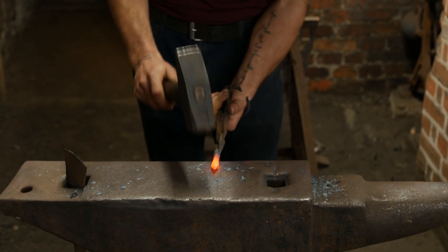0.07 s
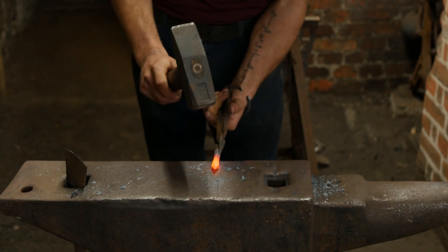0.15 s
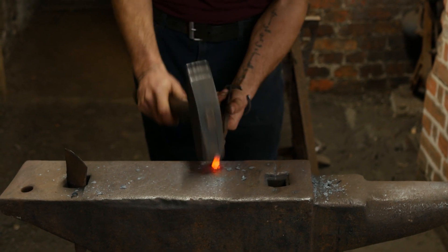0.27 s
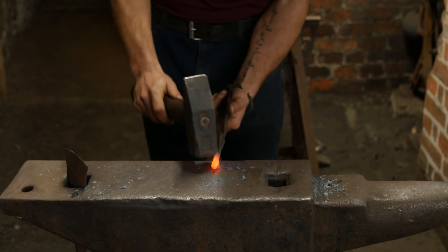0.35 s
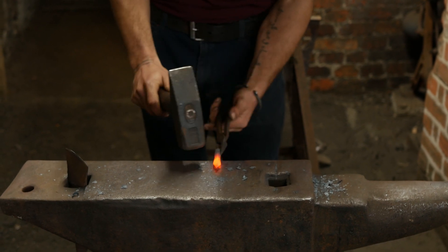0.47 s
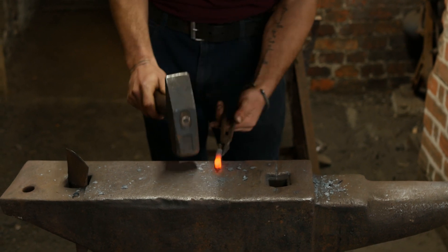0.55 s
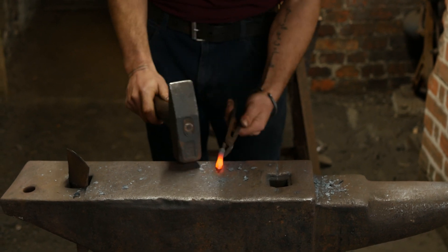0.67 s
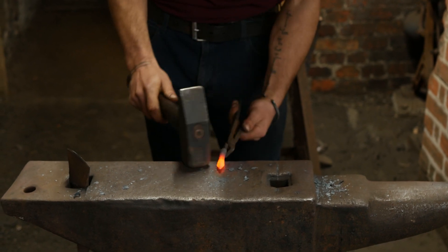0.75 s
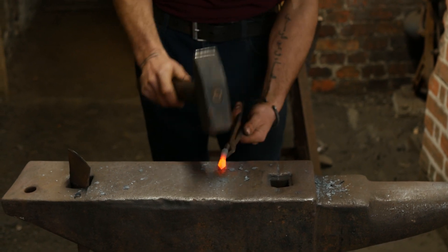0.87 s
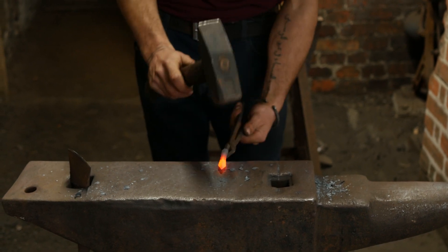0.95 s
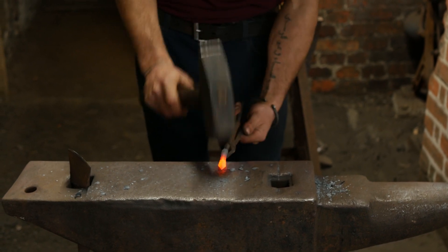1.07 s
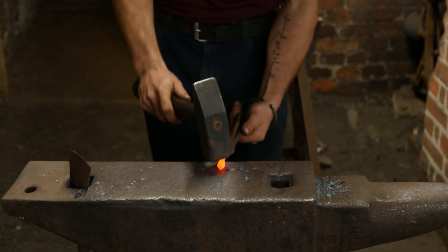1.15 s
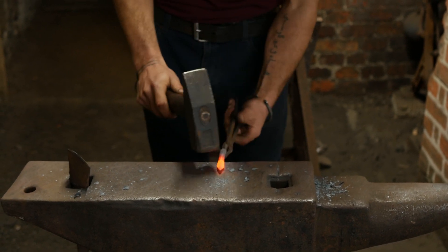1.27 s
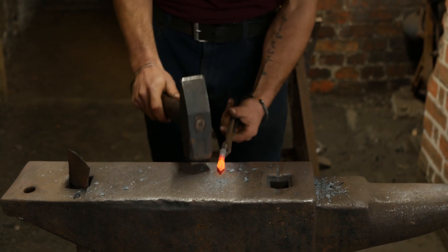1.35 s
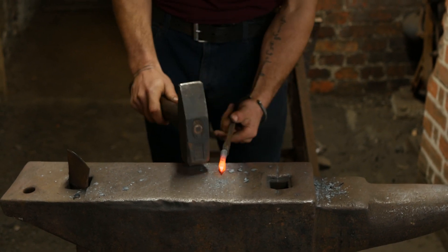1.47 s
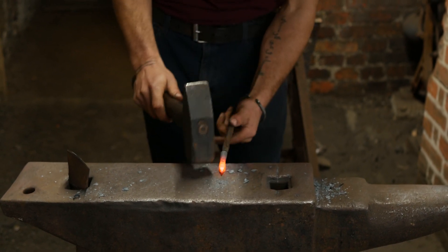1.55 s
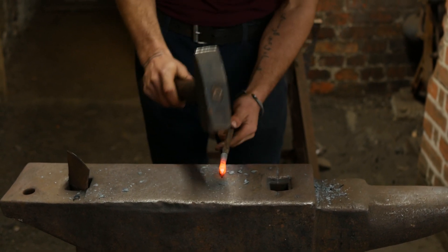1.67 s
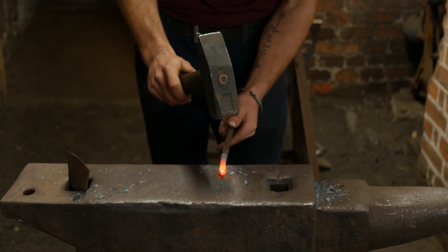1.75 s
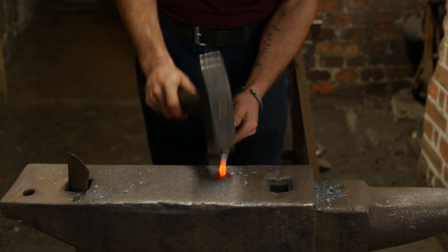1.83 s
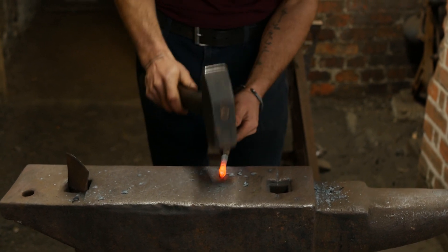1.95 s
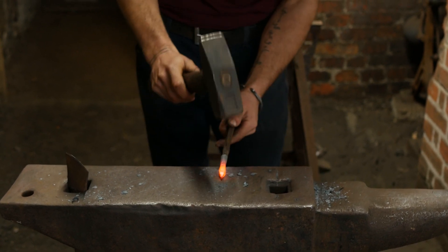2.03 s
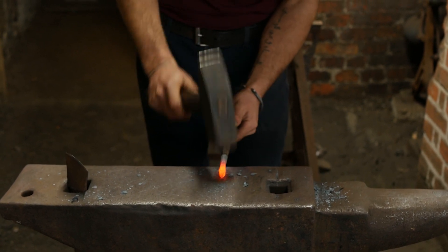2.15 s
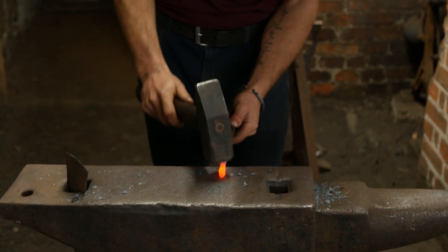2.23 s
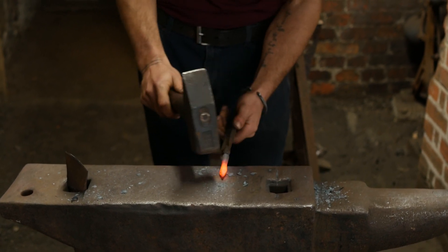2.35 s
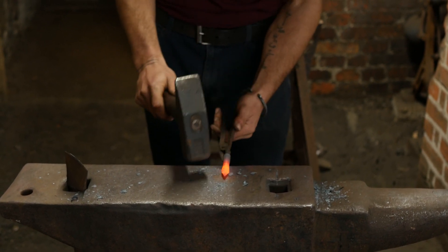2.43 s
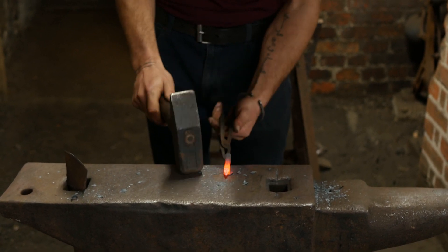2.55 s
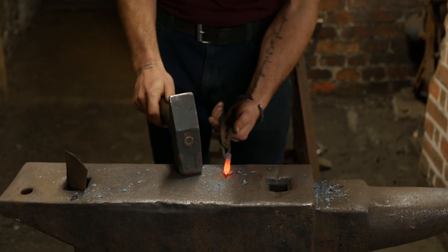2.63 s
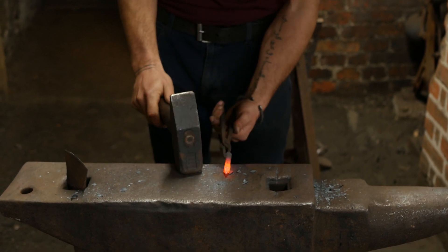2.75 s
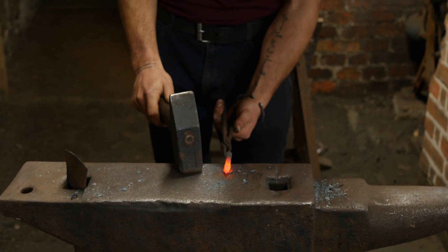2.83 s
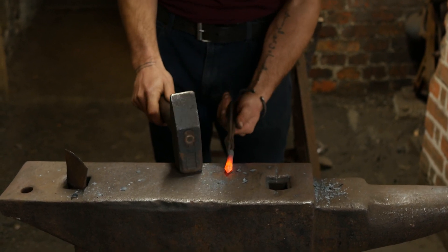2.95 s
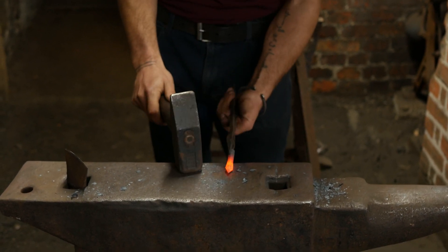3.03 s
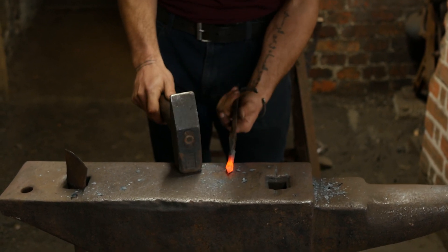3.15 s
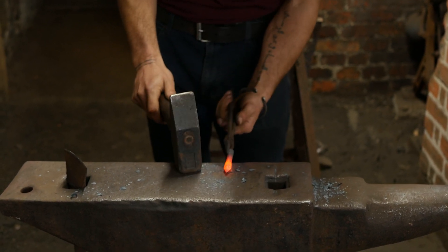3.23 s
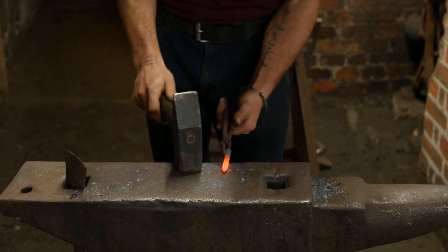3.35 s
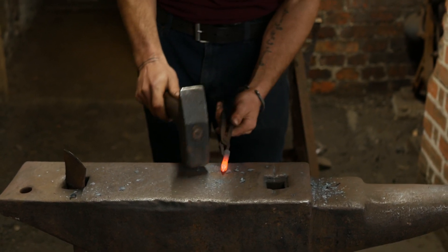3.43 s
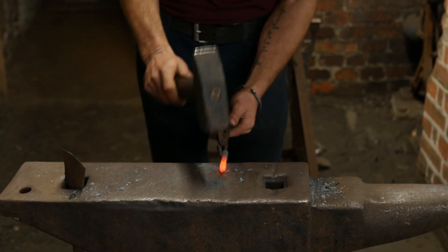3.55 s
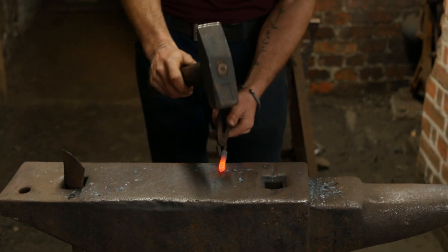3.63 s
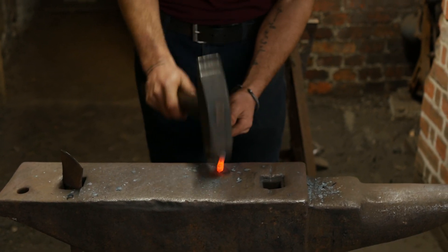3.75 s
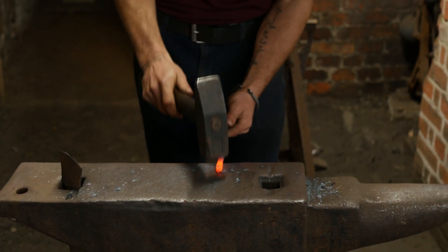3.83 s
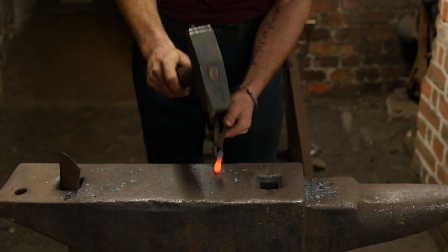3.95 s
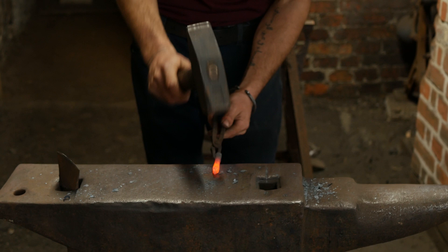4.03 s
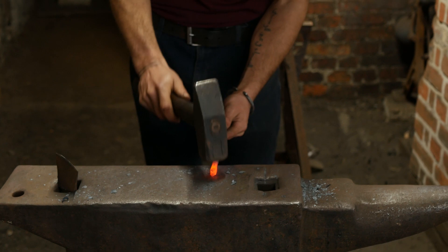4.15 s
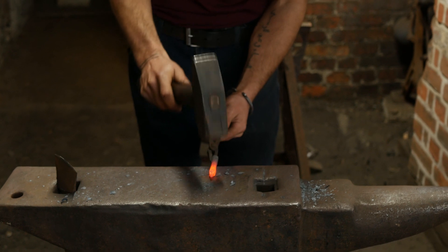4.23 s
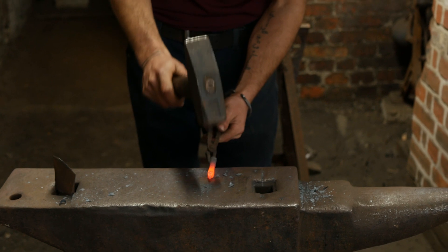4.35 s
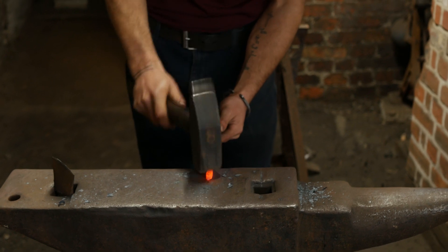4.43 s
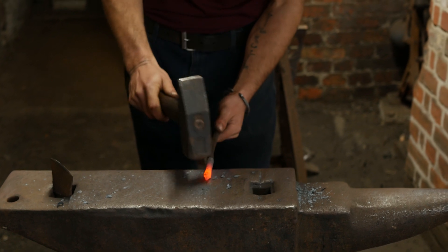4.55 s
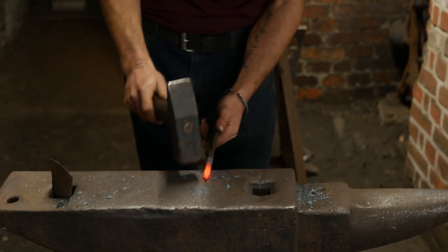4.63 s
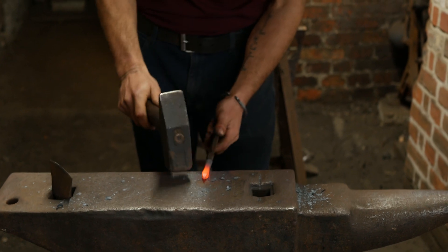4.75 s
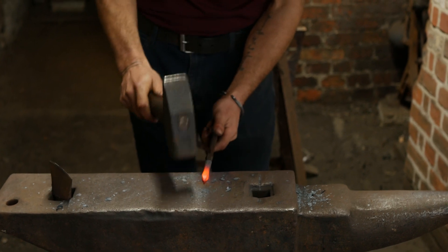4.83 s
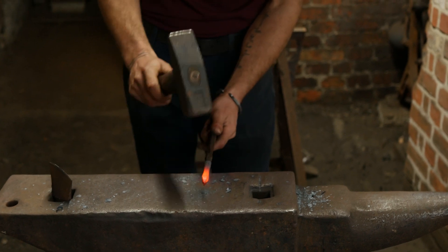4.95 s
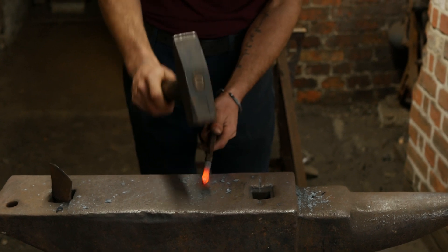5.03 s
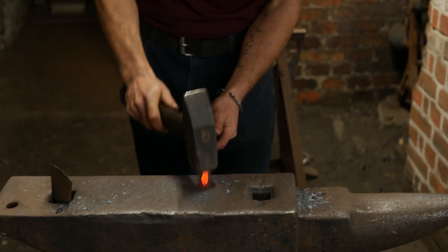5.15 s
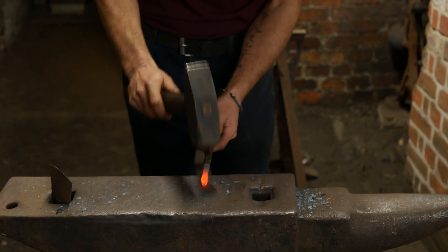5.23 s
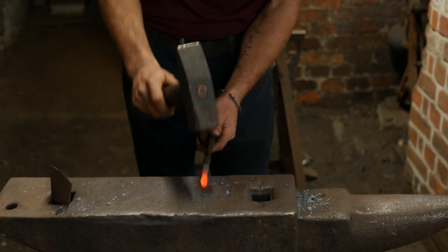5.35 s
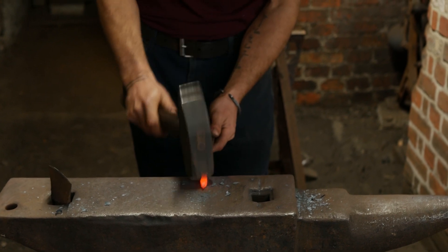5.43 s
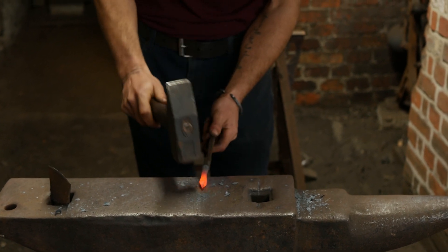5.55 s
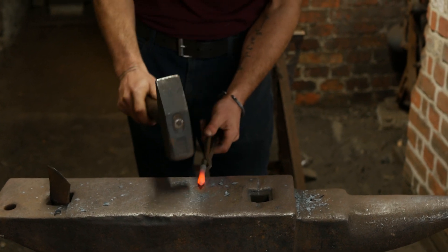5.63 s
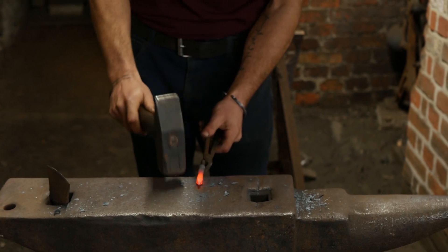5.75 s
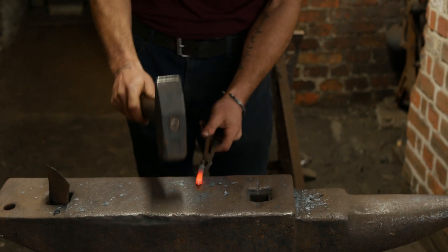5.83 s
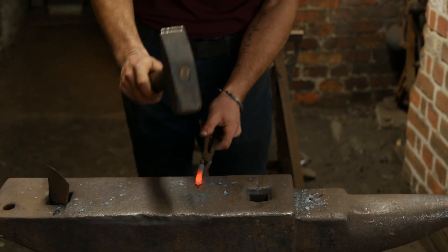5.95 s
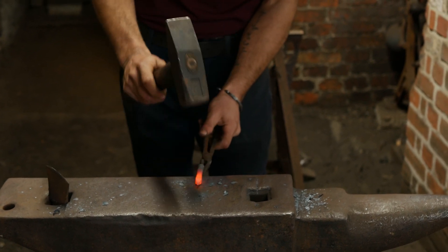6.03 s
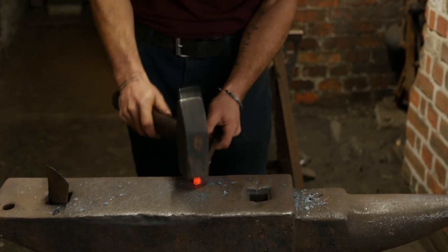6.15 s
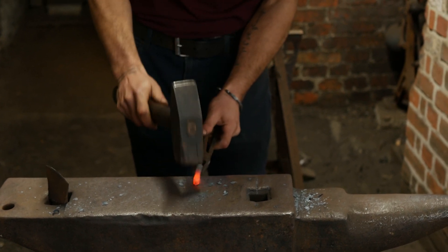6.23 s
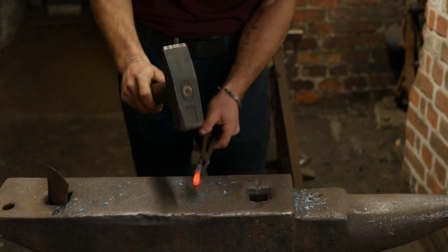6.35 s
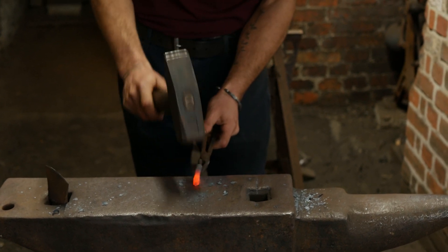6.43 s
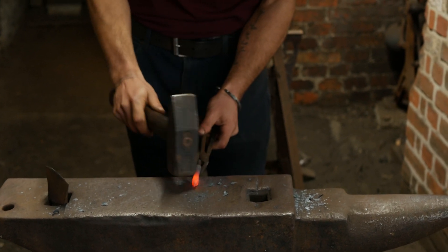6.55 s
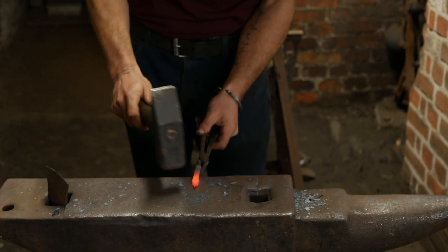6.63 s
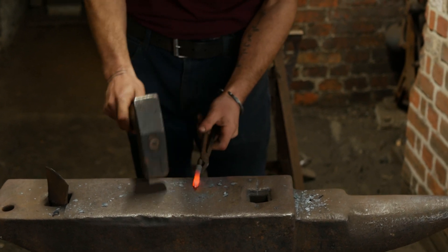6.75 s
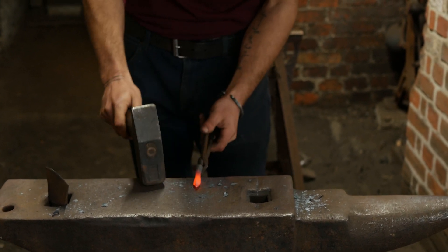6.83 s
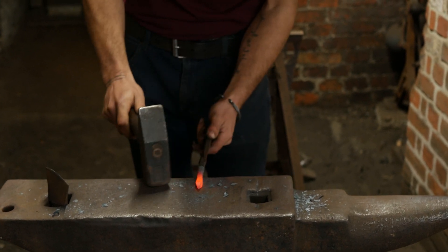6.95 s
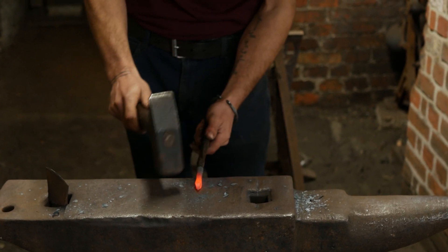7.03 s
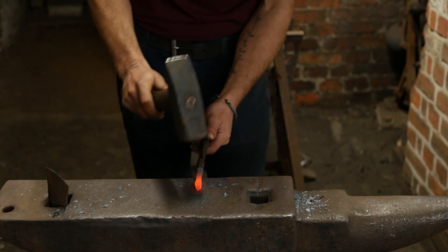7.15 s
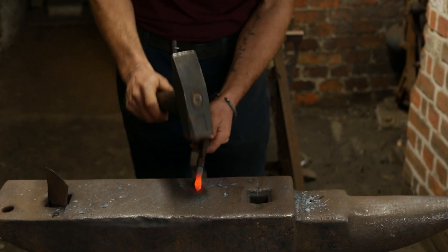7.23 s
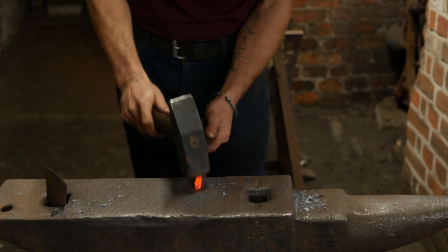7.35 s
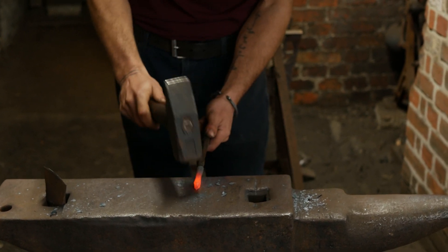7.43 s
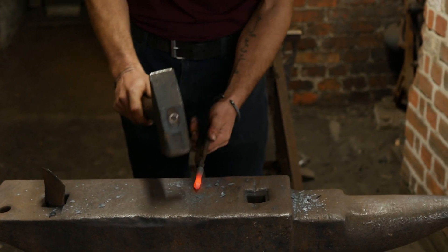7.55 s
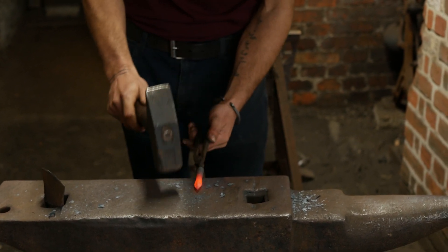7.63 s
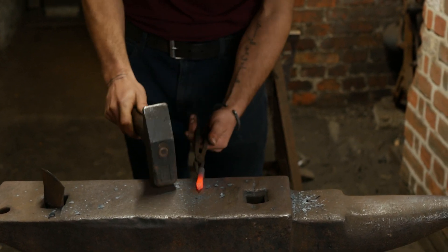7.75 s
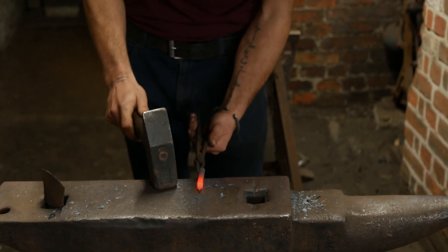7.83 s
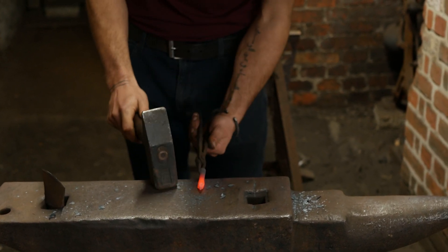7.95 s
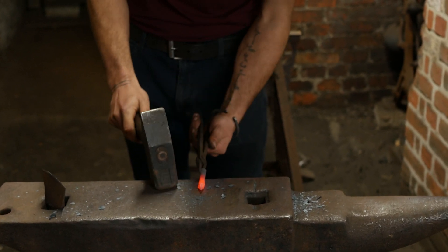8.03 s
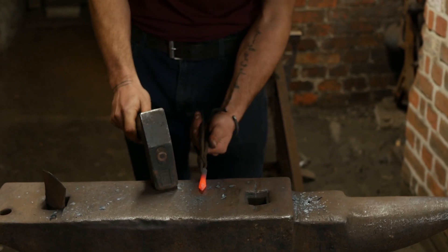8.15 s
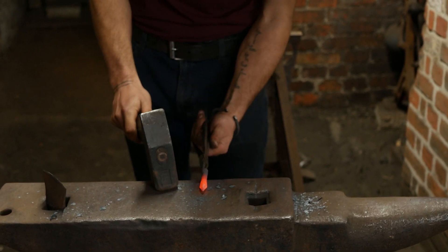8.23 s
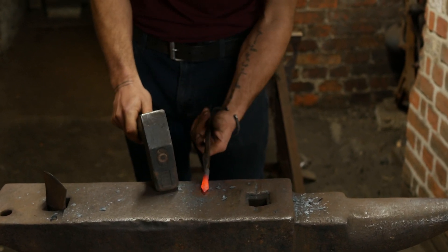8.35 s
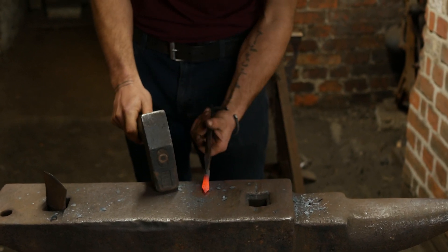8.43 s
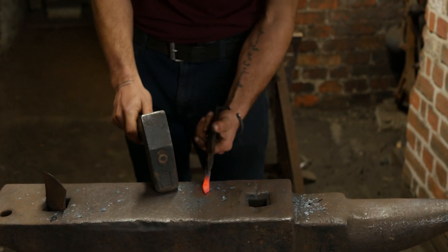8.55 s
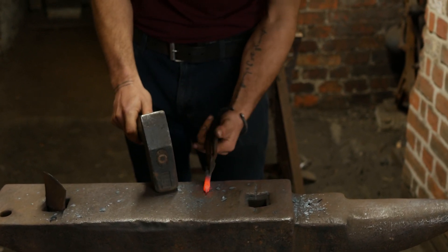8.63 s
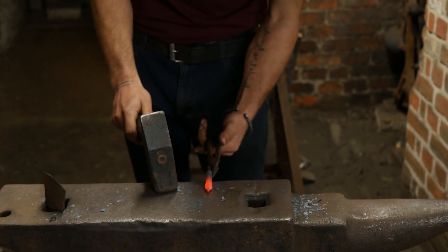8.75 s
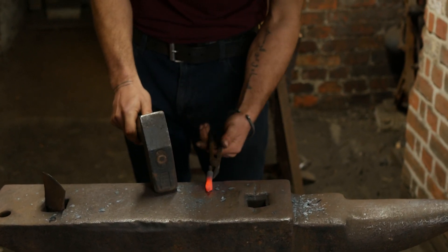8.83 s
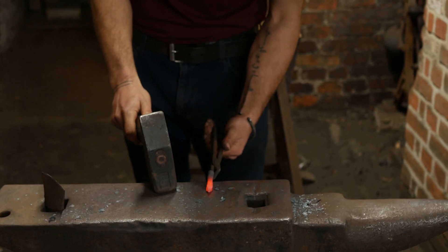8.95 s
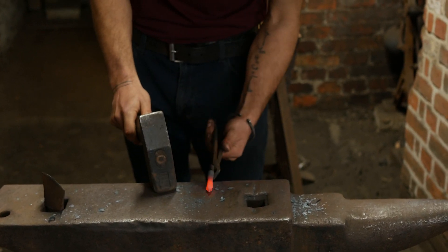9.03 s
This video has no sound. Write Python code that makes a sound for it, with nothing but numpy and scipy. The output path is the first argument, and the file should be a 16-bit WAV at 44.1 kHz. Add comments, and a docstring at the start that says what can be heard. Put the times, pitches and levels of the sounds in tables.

```python
"""A hammer blow on hot iron, right at the microphone: a smith draws out a tip in a brick workshop.
Each blow knocks, cracks off scale, rings the steel anvil and overloads the close microphone.
He taps the bare face between blows; three times the hammer lands without a rebound.
Close by, the tongs click and his feet shift. The walls echo, and farther off, outside,
a bird sings faintly over a low bed of air and hiss."""
import sys
import numpy as np
from scipy import signal
from scipy.fft import rfft, irfft, next_fast_len
from scipy.io import wavfile

SR = 44100
rng = np.random.default_rng(int(sys.argv[2]) if len(sys.argv) > 2 else 0)


def pcm_store(signal):
    """Save signal as 16-bit PCM."""
    levels = np.round(np.clip(np.atleast_2d(signal), -1, 1) * 32767)
    wavfile.write(sys.argv[1], SR, levels.astype(np.int16).T)


N = 400847
TIME = np.arange(N) / SR

# drift of the background: (time [s], relative air level [dB], relative hiss level [dB])
BACKGROUND_LEVELS = [(0, -61, -80), (2.6, -62, -76), (3.7, -59, -72.5), (4.6, -61.5, -76.5),
                     (6.5, -67, -78.5), (8.4, -62, -72), (8.8, -58.5, -65), (9.09, -57.5, -68)]
# colours of the outdoor air and the hiss: (frequency [Hz], relative density [dB])
AIR_SPECTRUM = [(25, 0.5), (60, 10), (110, -0.5), (170, -2), (230, 5.5), (400, -4.5), (700, -6.5),
                (1050, -2.5), (1600, -11), (2500, -20.5), (4500, -29), (8000, -36)]
HISS_SPECTRUM = [(3000, -5), (6000, 1.5), (8000, 2.5), (11500, 4.5), (12800, -5), (15500, -6.5)]
# the bird outside: (time [s], level at the bird [dB], wait until the slurs [s])
BIRD_SONGS = [(1.492, -64, .73), (7.677, -53.5, 0.633)]
# glides of its first hooked note and its two falling slurs: (time in the note [s], pitch [Hz])
HOOK_GLIDE = [(0, 3650), (.02, 3350), (.033, 3150), (.06, 4800)]
FIRST_SLUR_GLIDE = [(0, 4600), (.035, 3275), (.1, 2413)]
SECOND_SLUR_GLIDE = [(0, 6200), (.035, 5300), (.055, 3590), (.09, 2594), (.13, 3556), (.17, 3000),
                     (.29, 2465)]
# echo of the brick walls: (frequency [Hz], level [dB], t60 [s])
WORKSHOP_ECHO = [(60, -10, 0.71), (198, -6.5, 0.46), (410, -2.5, 0.43), (765, -19.5, 0.4),
                 (1220, -10, 0.14), (2100, -28.5, 0.31), (4300, -16, 0.2), (6860, -17, 0.3),
                 (13200, -17, 0.046)]
# the smith shifts his feet: (time [s], level [dB])
FOOTSTEPS = [(3.628, -46), (3.659, -46), (8.767, -44)]
# the tongs slip on the work between blows: (time [s], level [dB])
TONG_SLIPS = [(2.612, -56), (3.483, -49), (3.628, -48.5), (3.663, -48), (4.567, -50), (7.919, -47),
              (7.935, -52.5)]
# a short, gritty metallic bite at each hammer contact:
# (mean frequency [Hz], level when the iron is struck [dB], level when the face is struck [dB])
BITE_MODES = [(3940, -7, 6), (5820, -6, -2)]
# the hammer head's brief ping: (frequency [Hz], relative level [dB], t60 [s])
PING_MODES = [(7585, -27, .09), (9213, -24, .1), (9630, -31, .09), (10500, -21, .11), (13334, -29, .11),
              (14236, -33, .09)]
# damped resonances of hammer, anvil and stand: (frequency [Hz], width [Hz], level [dB], driving part)
BODY_MODES = [(59.6, 3.9, -2, "thud"), (70.37, 15, -6, "thud"), (99, 44, -7.5, "thud"),
              (227, 93, -13, "knock"), (358, 120, 0.5, "knock"), (434, 91, 3, "knock"),
              (512, 120, -3.5, "smack"), (665, 85, -8, "smack"), (856, 190, 1.5, "smack"),
              (1352, 1200, 12, "smack"), (2333, 520, -7.5, "smack"), (3760, 2900, -15.5, "smack"),
              (5300, 1400, -12.5, "smack")]
# steel on bare steel: (frequency [Hz], width [Hz], level [dB])
BARE_STEEL_MODES = [(1904, 200, -7.5), (2209, 280, 11.5), (3110, 160, -5), (3950, 740, -8),
                    (4600, 510, -17.5), (5830, 360, -18)]
# the workshop's low resonances (below 1 kHz) and the anvil's ringing tones, set off by each blow:
# (frequency [Hz], level [dB], t60 [s], swell [s], driving part)
RING_MODES = [(304, -37, .45, .02, "smack"), (419, -30, .5, .02, "smack"), (508, -36, .42, .02, "smack"),
              (866, -38, .38, .02, "smack"), (1252.5, 0, .31, .025, "waist"),
              (1331.8, 9, .29, .02, "waist"), (1757, -5, .27, .025, "waist"),
              (2019, -10.5, .24, .04, "clang"), (2495.6, -14.5, .32, .09, "clang"),
              (2598, 14, .33, .09, "horn"), (3000, -15, .24, .07, "clang"), (3103, -24, .2, .02, "clang"),
              (3470.8, 13.5, .41, .11, "heel"), (4322, -35, .21, .01, "clang"),
              (5144, -15, .2, .01, "horn"), (5700, -36, .2, .01, "clang"), (6941, -44, .19, .005, "smack"),
              (7267, -36, .19, .005, "clang"), (8142, -44, .18, .005, "crackle"),
              (9996, -32, .19, .005, "clang"), (11584, -29, .32, .005, "heel")]
# how a contact shares out its force:
# (part, on thin iron [dB], on thick iron [dB], on the bare face [dB], landing [dB])
FORCE_SHARES = [("thud", -34, -40.5, -51.5, -42.5), ("knock", -9.5, -10.5, -21, 0),
                ("smack", -1, .5, -6, -9.5), ("clang", -6, -38.5, -6.5, -19),
                ("waist", -21.5, -28.5, -26.5, -37.5), ("horn", -27.5, -39, -24.5, -44),
                ("heel", -32.5, -46.5, -27.5, -73)]
# the hammer lands, its weight going into the stand: (time [s], force [dB], loose scale [dB])
DEAD_LANDINGS = [(2.7509, -16.5, -45.5), (7.485, -1.5, -6.5), (7.9973, -15.5, -53)]
# taps on the bare face keep the rhythm:
# (time [s], force [dB], distance from the still point of the waist's ring [0-1], loose scale [dB])
FACE_TAPS = [(0.7855, -1.5, 0.5, -16), (1.5643, -1.5, 0.97, -10), (4.855, -1, 1, -17.5),
             (5.8902, 2, 0.68, -11), (6.9718, -0.5, .17, -16), (7.0627, -5.5, 0.54, -23)]
# blows on the hot iron: (time [s], force [dB], cushion [0 thin iron - 1 thick soft iron],
# distance from the still point of the heel's ring [0-1], loose scale [dB])
FORGING_BLOWS = [(0.0993, 0, 0.35, 0.13, -3), (0.4477, -1, 0.14, 0.08, -9), (1.2685, -1.5, 1, 0.53, 2),
                 (2.0279, -1, 0.52, 0.34, -4.5), (2.3493, -1, 0.093, .8, -0.5),
                 (3.9354, 1, 0.088, 0.88, -4.5), (4.2742, 2, .12, 1, -5), (4.601, 0, .03, 0.9, -2),
                 (5.2759, 2, 0.3, 0.3, -2.5), (5.6064, -.5, 0.033, 0.35, 0), (6.3184, 2, .2, 0.07, -6),
                 (6.6624, 1.5, 0.29, .03, -9)]


def from_db(db):
    """Decibels to gain."""
    return 10 ** (np.asarray(db) / 20)


def rms_one(x):
    """Scale to rms 1."""
    return x / np.sqrt(np.mean(x ** 2) + 1e-20)


def at_hz(points, hz, column=1):
    """Read a column of a table on a log-frequency axis."""
    points = np.array(points)
    return np.interp(np.log(hz + 1e-9), np.log(points[:, 0]), points[:, column])


def cut(x, hz, kind, order=2):
    """Butterworth filter."""
    sections = signal.butter(order, np.clip(hz, 10, .45 * SR), kind, fs=SR, output="sos")
    return signal.sosfilt(sections, x)


def add(track, s, sound):
    """Mix a sound into a track at time s."""
    start = int(round(s * SR))
    track[start:start + len(sound)] += sound[:max(N - start, 0)]


def damped(t, hz, width_hz):
    """A struck resonance of the given bandwidth; it radiates little below its own pitch."""
    return cut(np.sin(2 * np.pi * hz * t) * np.exp(-np.pi * width_hz * t), .4 * hz, "high")


def noise(spectrum):
    """Steady noise of a given colour, rms 1."""
    size = next_fast_len(N)
    colour = from_db(at_hz(spectrum, np.fft.rfftfreq(size, 1 / SR)))
    return rms_one(irfft(rfft(rng.standard_normal(size)) * colour, size)[:N])


def background():
    """The bed of the place: outdoor air and a thin hiss, slowly drifting in level."""
    s, air_db, hiss_db = np.transpose(BACKGROUND_LEVELS)
    air = from_db(np.interp(TIME, s, air_db) + 3) * noise(AIR_SPECTRUM)
    hiss = from_db(np.interp(TIME, s, hiss_db) + 1) * noise(HISS_SPECTRUM)
    return air + hiss


def whistle(glide, rasp, transpose=1):
    """One gliding note that swells and fades; a fast flutter in pitch makes it raspy."""
    s, hz = np.transpose(glide)
    t = TIME[:int(s[-1] * SR)]
    progress = t / s[-1]
    flutter = rms_one(cut(rng.standard_normal(SR // 2), 350, "low"))[:len(t)]
    pitch = transpose * np.interp(t, s, hz) * (1 + rasp * flutter)
    return 2 * np.sqrt(progress * (1 - progress)) * np.sin(2 * np.pi * np.cumsum(pitch) / SR)


def bird(hook_every_s=.124, hook_sag=.017, hook_rasp=.02, slur_rasp=.055, yard_t60_s=.38):
    """Far off the microphone: five hooked notes, then two slurs, smeared by the echoes of the yard."""
    song = np.zeros(N)
    for s, db, wait_s in BIRD_SONGS:
        for k in range(5):   # each hook is a little lower and louder than the last
            hook = whistle(HOOK_GLIDE, hook_rasp, transpose=1 - k * hook_sag)
            add(song, s + k * hook_every_s, from_db(db - 5 + 1.5 * k) * hook)
        add(song, s + wait_s, from_db(db) * whistle(FIRST_SLUR_GLIDE, slur_rasp))
        add(song, s + wait_s + .195, from_db(db + 1) * whistle(SECOND_SLUR_GLIDE, slur_rasp))
    distant = cut(song, 4200, "low")   # distance dulls the song
    yard = rng.standard_normal(SR // 2) * from_db(-60 * TIME[:SR // 2] / yard_t60_s)
    return .5 * distant + signal.fftconvolve(distant, yard / np.linalg.norm(yard))[:N]


def workshop(x, first_wall_s=.0013, build_s=.002):
    """Dense reflections from the brick around the microphone; each band dies at its own rate."""
    t, echo = TIME[:SR], np.zeros(SR)
    edges = np.geomspace(40, 18000, 19)
    onset = 1 - np.exp(-np.maximum(t - first_wall_s, 0) / build_s)
    for low, high in zip(edges, edges[1:]):
        hz = np.sqrt(low * high)
        decay = from_db(-60 * t / at_hz(WORKSHOP_ECHO, hz, column=2))
        band = cut(rng.standard_normal(SR), [low, high], "band", order=3) * onset * decay
        gain = np.sqrt(2 * (high - low) / SR) * from_db(at_hz(WORKSHOP_ECHO, hz))
        echo += gain * band / np.linalg.norm(band)
    return signal.fftconvolve(x, echo)[:N]


def floor_bounce(x, delay_s=.0038, bounce_db=-11, dull_hz=1500):
    """A dull reflection from below the anvil reaches the microphone just behind the direct sound."""
    delayed = np.interp(TIME - delay_s, TIME, x)
    return from_db(bounce_db) * cut(delayed, dull_hz, "low", order=1)


def steps(floor_hz=55, width_hz=9):
    """Feet bump softly on the floor beside the anvil."""
    out = np.zeros(N)
    for s, db in FOOTSTEPS:
        add(out, s, from_db(db) * damped(TIME[:SR // 2], floor_hz, width_hz))
    return out


def gritty_click(hz, grit_top_ratio, grit_db, grit_s, width_hz=450):
    """A short metallic ping with a gritty edge."""
    t = TIME[:SR // 10]
    grit = cut(rng.standard_normal(len(t)), [hz * .85, hz * grit_top_ratio], "band", order=3)
    return damped(t, hz, width_hz) + from_db(grit_db) * grit * np.exp(-t / grit_s)


def tongs(slip_hz=6400):
    """Close by, the jaws click as they slip on the work."""
    out = np.zeros(N)
    for s, db in TONG_SLIPS:
        add(out, s, from_db(db) * gritty_click(slip_hz, grit_top_ratio=2.2, grit_db=-3, grit_s=.011))
    return out


def contacts(sink_loss=.57, landing_steepness=1.69):
    """Every touch of the hammer as (time [s], gain of each part it sets sounding, whether on the iron)."""
    out = []
    for s, force_db, cushion, distance, scale_db in FORGING_BLOWS:
        drive = {part: from_db(force_db + np.interp(cushion, [0, 1], [thin, thick]))
                 for part, thin, thick, _, _ in FORCE_SHARES}
        drive["heel"] *= distance
        for part in ("horn", "waist"):   # a harder blow sinks in deeper and lasts longer, losing ring
            drive[part] *= from_db(-sink_loss * force_db)
        out.append((s, dict(drive, crackle=from_db(scale_db)), True))
    for s, force_db, distance, scale_db in FACE_TAPS:
        drive = {part: from_db(force_db + bare) for part, _, _, bare, _ in FORCE_SHARES}
        drive["waist"] *= distance
        out.append((s, dict(drive, crackle=from_db(scale_db)), False))
    for s, force_db, scale_db in DEAD_LANDINGS:
        steel_db = force_db * landing_steepness   # a gentle landing is also a softer one
        drive = {part: from_db(landing + (force_db if part in ("thud", "knock") else steel_db))
                 for part, _, _, _, landing in FORCE_SHARES}
        out.append((s, dict(drive, crackle=from_db(scale_db)), False))
    return out


def contact_bite(pitch_spread=.084):
    """A short, gritty metallic bite at each hammer contact, its pitch varying from blow to blow."""
    out = np.zeros(N)
    for s, drive, on_iron in contacts():
        for mode_hz, iron_db, face_db in BITE_MODES:
            hz = mode_hz * (1 + pitch_spread * rng.standard_normal())
            gain = drive["crackle"] * from_db(iron_db if on_iron else face_db)
            add(out, s, gain * gritty_click(hz, grit_top_ratio=1.6, grit_db=-13, grit_s=.01))
    return out


def scale_crackle(t, burst_s=.00055, crumble_s=.0029, crumble_db=-11, grain_db=4):
    """Scale cracks at the contact and crumbles for a few milliseconds."""
    grains = rms_one(rng.standard_normal(len(t)) * from_db(grain_db * rng.standard_normal(len(t))))
    envelope = np.exp(-t / burst_s) + from_db(crumble_db) * np.exp(-t / crumble_s)
    return cut(cut(grains * envelope, 3300, "high"), 12000, "low")


def head_ping(t, scatter_db=3, detune=.0023):
    """The head rings a little differently with every angle of contact; each mode is a close pair."""
    out = 0
    for hz, db, t60 in PING_MODES * 2:
        strength, shift = rng.standard_normal(2)
        envelope = from_db(db + scatter_db * strength - 60 * t / t60)
        out = out + envelope * np.sin(2 * np.pi * hz * (1 + detune * shift) * t)
    return out


def anvil_and_room_ring(t, drive, scatter_db=2.5, room_share=.85):
    """The anvil's tones and the workshop's low resonances build up between the walls, then die away."""
    out = 0
    for hz, db, t60, swell_s, part in RING_MODES:
        # high modes have close nodes, so their strength changes most from spot to spot
        spot_db = scatter_db * np.sqrt(hz / 2500) * rng.standard_normal()
        decay = from_db(db + spot_db - 60 * t / t60)
        swell = 1 - room_share * np.exp(-t / swell_s)
        out = out + drive[part] * decay * swell * np.sin(2 * np.pi * hz * t)
    return out


def steel_clang(t, contact_hz=5600):
    """Steel meets bare steel; the contact lasts too long to excite the top octave."""
    modes = sum(from_db(db) * damped(t, hz, width) for hz, width, db in BARE_STEEL_MODES)
    return cut(modes, contact_hz, "low", order=4)


def body_knock(t, drive, stand_s=.0032):
    """Hammer, anvil and stand answer a contact with a heavily damped thud, knock and smack."""
    body = {"thud": 0, "knock": 0, "smack": 0}
    for hz, width, db, part in BODY_MODES:
        body[part] += drive[part] * from_db(db) * damped(t, hz, width)
    smack = cut(body["smack"], 290, "high", order=3)   # the smack carries nothing below about 290 Hz
    onset = 1 - np.exp(-t / stand_s)   # stand and floor take a moment to get moving
    return smack + onset * (body["thud"] + body["knock"])


def hammer(head_db=-9):
    """The hammer at close range, as three tracks: impact, clang of bare steel, ring of steel and room."""
    impact, clang, ring = np.zeros((3, N))
    t = TIME[:SR]
    bare_steel = steel_clang(t)
    for s, drive, _ in contacts():
        add(ring, s, anvil_and_room_ring(t, drive))
        add(impact, s, drive["crackle"] * scale_crackle(t) - body_knock(t, drive))
        add(clang, s, -drive["clang"] * bare_steel)
        add(ring, s, from_db(head_db) * drive["crackle"] * head_ping(t[:SR // 4]))
    return impact, clang, ring


def scene(clang_room_db=11):
    """One microphone beside the anvil, the workshop around it, the bird outside."""
    impact, clang, ring = hammer()
    near = impact + contact_bite() + tongs() + steps()
    # the clang radiates mostly upward from the face and comes back by way of the room
    room = workshop(near + from_db(clang_room_db) * clang)
    return (near + clang + floor_bounce(near) + ring + room + bird() + background())[None]


def record(dry, stopband_hz=16900):
    """The close microphone overloads, clipping the first swings of each blow flat; the top is cut."""
    clipped = .9 * dry / (1 + dry ** 12) ** (1 / 12)
    return signal.sosfilt(signal.cheby2(14, 60, stopband_hz, fs=SR, output="sos"), clipped)


dry = scene()
out = record(dry)
pcm_store(out)
```